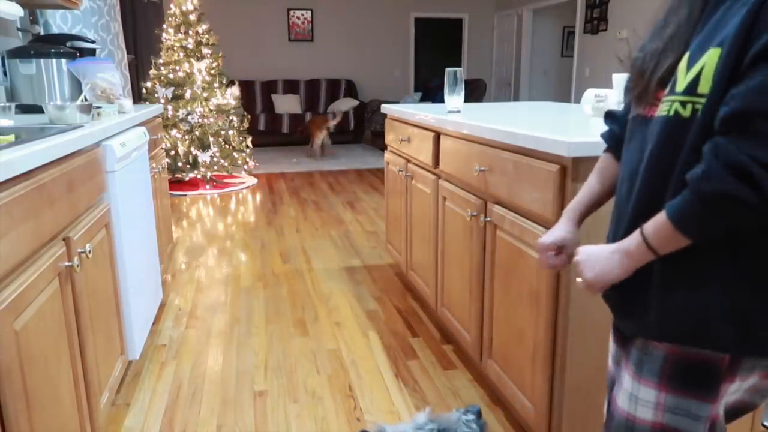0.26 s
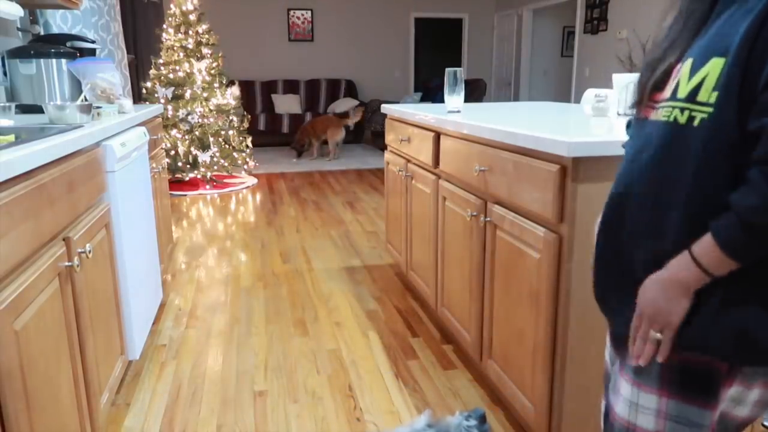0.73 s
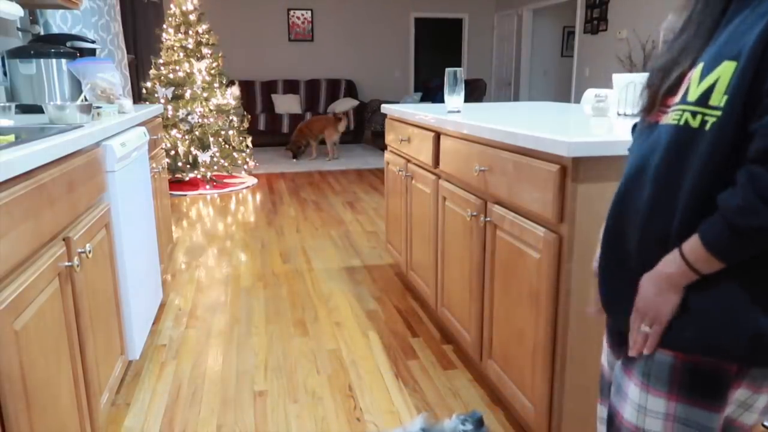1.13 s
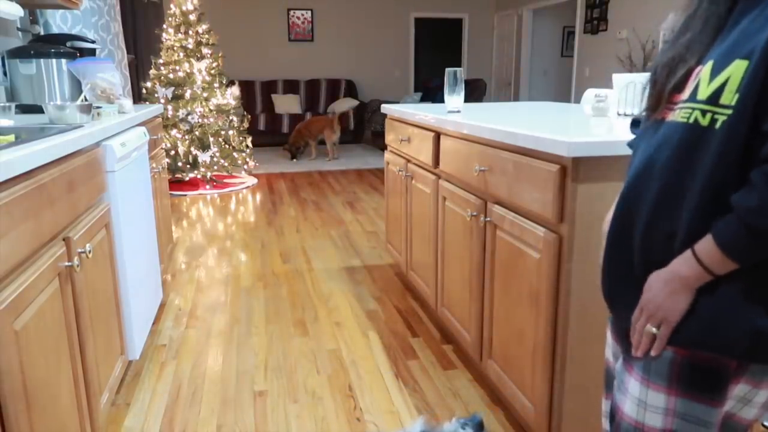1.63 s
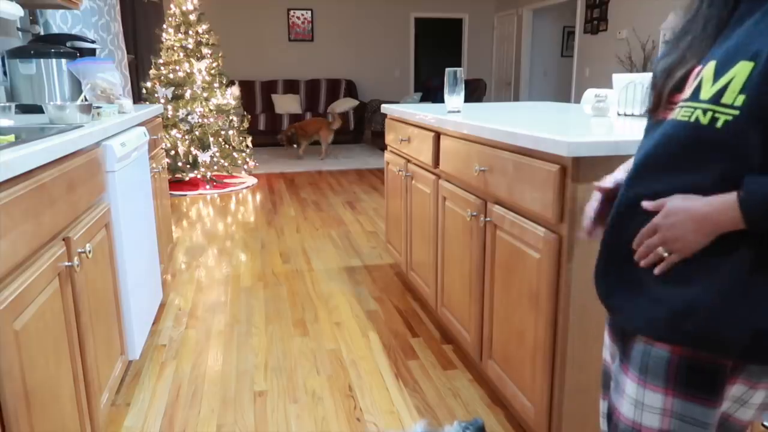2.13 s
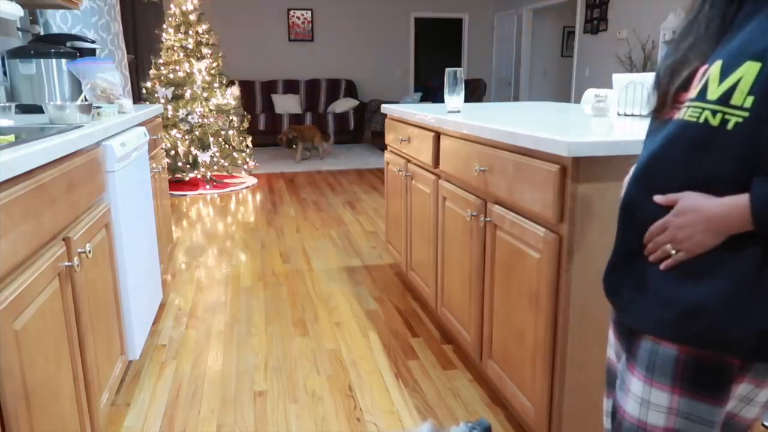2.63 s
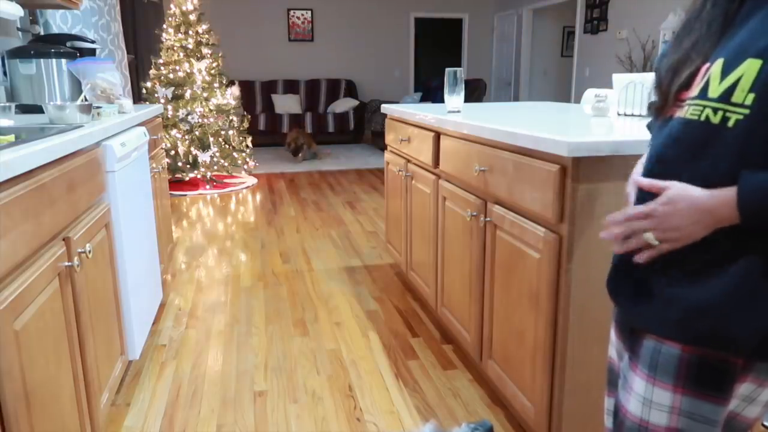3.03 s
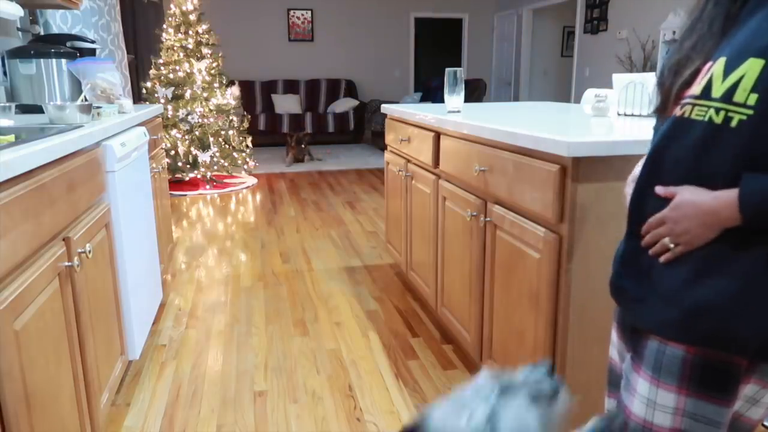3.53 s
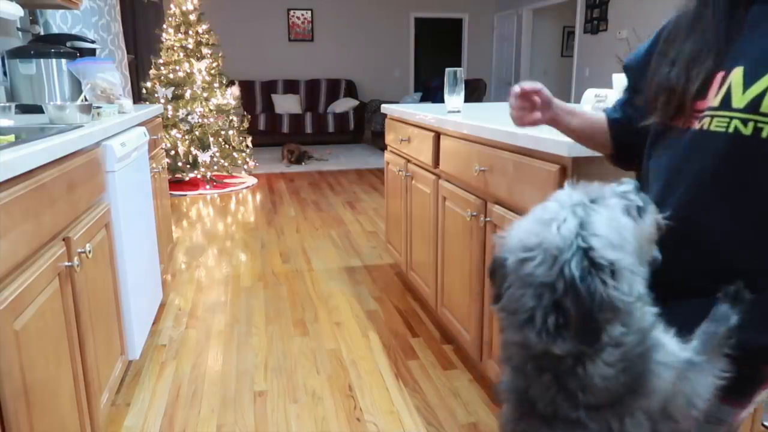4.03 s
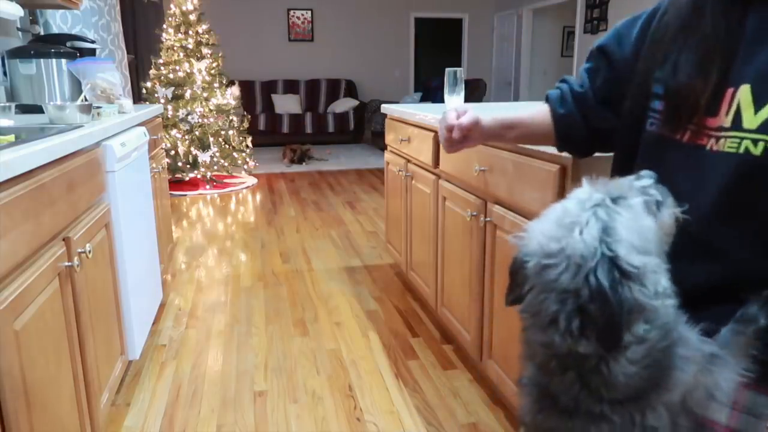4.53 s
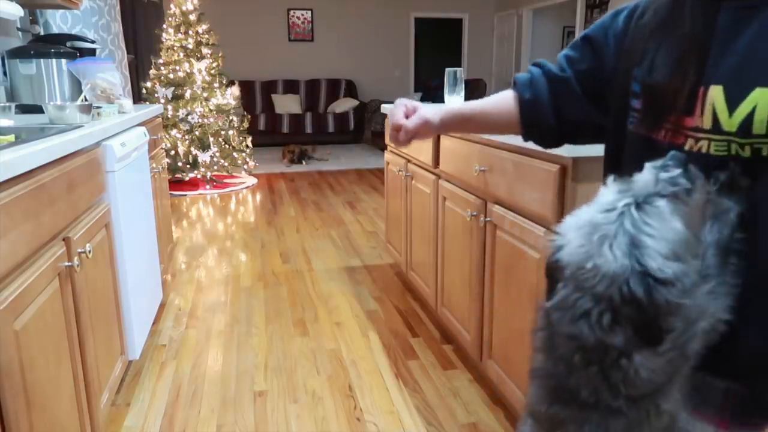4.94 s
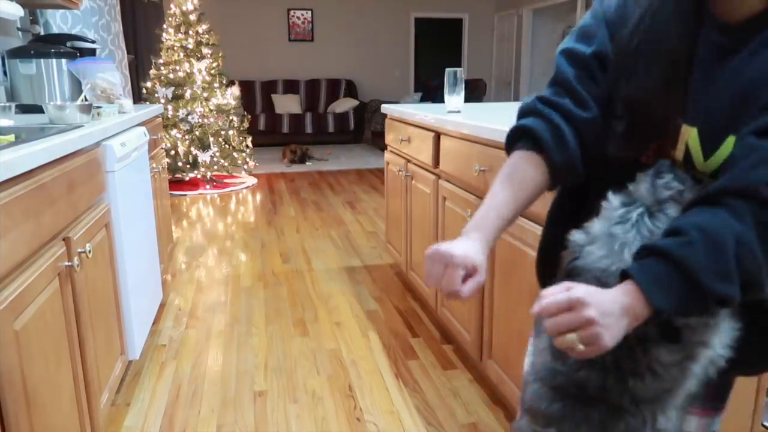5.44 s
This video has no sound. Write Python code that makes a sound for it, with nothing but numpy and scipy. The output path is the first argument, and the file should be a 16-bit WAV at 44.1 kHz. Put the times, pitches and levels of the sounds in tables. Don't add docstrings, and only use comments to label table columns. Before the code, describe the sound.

Throughout, a kitchen appliance runs in an open living space: a low, slightly wavering pump hum, steady mains buzz, resonant airy noise and very thin high whines. At 0.1 s cloth brushes softly; around 0.8 s a sharper rustle comes with a small chattering wooden knock. Single claw ticks follow near 1.0 and 1.55 s. At 2.15 s there is another hollow knock with a brief chirping slip, then brighter nail clicks at 2.35 and 2.44 s. Soft fabric movement and a faint knock pass around 2.9-3.4 s, more cloth at 3.9 s. From 4.25 to 4.85 s a dog's nails trot quickly over the boards, with tiny metallic tag glints. A deep, dull thump lands at 4.94 s, a heavier one at 5.34 s, shuddering through the floor among rustles and paw taps. A last clear claw tap sounds at 5.64 s. Close stereo pickup, short reverberation.

```python
import sys
import numpy as np
from scipy import signal
from scipy.fft import rfft, irfft
from scipy.io import wavfile
from scipy.ndimage import uniform_filter1d

SR = 44100
rng = np.random.default_rng(int(sys.argv[2]) if len(sys.argv) > 2 else 0)


def log_audio(samples):
    frames = np.atleast_2d(samples).T
    limited = np.clip(frames, -1, 1)
    pcm = np.round(limited * 32767).astype(np.int16)
    wavfile.write(sys.argv[1], SR, pcm)


def linear_from_db(decibels):
    return 10 ** (np.asarray(decibels, float) / 20)


N = 250516


def evened(x):
    return x / np.sqrt(np.mean(x ** 2) + 1e-20)


def read(points, hz, order=1):
    table = np.transpose(points)
    return np.interp(np.log(hz + 1), np.log(table[0] + 1), table[order])


def add(mix, s, sound):
    part = mix[round(s * SR):][:len(sound)]
    part += sound[:len(part)]


def spread(events, pattern, axis):
    rows = np.repeat(events, len(pattern), axis=0)
    steps = np.tile(pattern, (len(events), 1))
    out = rows + steps
    out[:, axis] = rows[:, axis] * steps[:, axis]
    return out


def wander(top_hz):
    t = np.arange(0, N + 200, 200) / SR
    rates = np.geomspace(0.15, top_hz, 20)
    slow = sum(np.sin(2 * np.pi * (f * t + rng.random())) / np.sqrt(f) for f in rates)
    return np.interp(np.arange(N) / SR, t, evened(slow))


def lines(turns, table, waver_db):
    out = np.zeros(N)
    for multiple, db in table:
        level = np.sqrt(2) * linear_from_db(db + waver_db * wander(top_hz=5.4))
        out += level * np.sin(2 * np.pi * (multiple * turns + rng.random()))
    return out


def ring(hz, t60, soft_s, size=3000):
    t = np.arange(size) / SR
    return linear_from_db(-60 * t / t60) * (1 - np.exp(-t / soft_s)) * np.sin(2 * np.pi * hz * t)


def burst(noise, low_hz, high_hz, t60):
    dying = noise * linear_from_db(-60 * np.arange(len(noise)) / SR / t60)
    crack = signal.lfilter(*signal.butter(3, [low_hz, high_hz], "band", fs=SR), dying)
    return crack / abs(crack).max()


def air():
    # frequency in Hz, density in dB per Hz.
    air_colour = [(20, -74.5), (45, -72), (70, -65), (100, -55.5), (230, -58.5), (265, -70), (400, -68),
                  (700, -74), (1500, -76), (2500, -77.5), (4000, -86), (7000, -95.5), (11000, -101),
                  (15000, -118)]
    # frequency in Hz, width in Hz, lift in dB.
    lifts = [(176, 52, 4), (202, 35, 0.5), (310.3, 27, 11), (369, 43, 10), (469, 39, 3.5), (502, 40, 8.5),
             (644.4, 26, 10.5), (771, 22, 6.5), (907, 113, 9), (982, 15, 7.5), (1173, 97, 11),
             (1358, 61, 7), (1875, 210, 8)]
    frames = N // 256 + 5
    real_1, imag_1, real_2, imag_2, patches = rng.standard_normal((frames, 513, 5)).T
    patches = evened(uniform_filter1d(uniform_filter1d(patches, 14, 0), 16, 1))
    # 2.2 dB more, faded in over 2500 Hz from 7500 Hz
    top = np.clip((np.fft.rfftfreq(1024, 1 / SR) - 7500) / 2500, 0, 1)[:, None]
    depth_db = 1.22 + 2.2 * top
    field_db = depth_db * patches - depth_db ** 2 * np.log(10) / 20
    spectra = np.array([real_1 + 1j * imag_1, real_2 + 1j * imag_2]) * linear_from_db(field_db)
    white = signal.istft(spectra, nperseg=1024, noverlap=768)[1][:, :N]
    hz = np.fft.rfftfreq(N, 1 / SR)
    colour_db = read(air_colour, hz)
    for centre_hz, width_hz, lift_db in lifts:
        colour_db = colour_db + lift_db / (1 + (2 * (hz - centre_hz) / width_hz) ** 2)
    swell = linear_from_db(0.5 * wander(top_hz=3))
    return irfft(rfft(evened(white) * swell) * linear_from_db(colour_db) * np.sqrt(SR / 2), N)


def hum():
    # multiple of the shaft speed, level in dB rms.
    shaft_lines = [(1, -52), (2, -51), (3, -51), (4, -32), (5, -42), (8, -44), (9, -51), (12, -49),
                   (16, -53), (24, -57), (28, -66)]
    # multiple of the mains frequency, level in dB rms.
    mains_lines = [(2, -44), (3, -47), (4, -50), (5, -47), (6, -51), (7, -56), (8, -57), (10, -57),
                   (12, -51), (14, -59), (16, -56), (18, -60), (20, -62), (22, -58), (30, -62), (40, -59),
                   (55, -72), (58, -71), (84, -77)]
    # frequency in Hz, level in dB rms.
    whines = [(9290, -82), (9650, -76)]
    shaft_hz, mains_hz = 41.043, 59.98
    t = np.arange(N) / SR
    shaft_turns = np.cumsum(shaft_hz * (1 + 0.0012 * wander(top_hz=1.5))) / SR
    pump = lines(shaft_turns, shaft_lines, waver_db=0.5)
    buzz = lines(mains_hz * t, mains_lines, waver_db=0.4)
    return pump + buzz + lines(t, whines, waver_db=3)


def rustles():
    # time of the top in seconds, level in dB rms, rise in s, fall in s, centre in Hz.
    strokes = [(0.132, -44.5, 0.012, 0.026, 5170), (0.773, -40, .003, 0.025, 4230),
               (0.786, -63, 0.009, 0.01, 8000), (1.188, -60, 0.016, 0.028, 6050),
               (1.549, -49, 0.0065, 0.023, 3880), (2.83, -71, .012, .025, 11500),
               (2.898, -58.5, 0.0091, 0.036, 7900), (2.93, -44.5, 0.023, 0.053, 2440),
               (3.371, -56.5, 0.038, 0.062, 8500), (3.384, -47.5, 0.098, 0.23, 3840),
               (3.9, -43.5, 0.1, 0.14, 2540), (4.69, -41.5, 0.01, 0.0082, 5200),
               (4.93, -47.5, 0.047, 0.061, 3280), (5.189, -37.5, 0.06, 0.011, 1880),
               (5.198, -53, 0.045, 0.24, 5600), (5.42, -41, 0.0076, 0.015, 5600)]
    out, t = np.zeros(N), np.arange(-8000, 8000) / SR
    noises = rng.standard_normal((len(strokes), 2, 16000))
    for (s, db, rise, fall, hz), (noise, grain) in zip(strokes, noises):
        fibres = noise * linear_from_db(3.5 * evened(uniform_filter1d(grain, 60)))
        band = evened(signal.lfilter(*signal.butter(3, [hz * 0.17, hz * 1.38], "band", fs=SR), fibres))
        stroke = band * linear_from_db(db) * np.exp(-0.5 * (t / np.where(t < 0, rise, fall)) ** 2)
        skip = max(8000 - round(s * SR), 0)
        add(out, s + t[skip], stroke[skip:])
    return out


def thumps():
    # start in seconds, level in dB, board in Hz, board level in dB, board t60 in s.
    pushes = [
        (4.9383, -10.5, 106, -1, .16),
        (5.3383, -4.5, 152, 0.5, .23),
        (5.4, -18, 130, 0, .2),
        (5.445, -21, 100, 0, .2),
        (5.52, -25, 70, 0, .2),
    ]
    # frequency in Hz, level in dB, t60 in s.
    floor_modes = [(61.2, -0.5, 0.26), (84, -5.5, 0.22), (122, -9.5, 0.17), (205.2, -20, 0.67),
                   (250, -16, 0.14)]
    out = np.zeros(N)
    t = np.arange(20000) / SR
    noises = rng.standard_normal((len(pushes), 20000))
    for (s, db, board_hz, board_db, board_t60), noise in zip(pushes, noises):
        rumble = linear_from_db(-6.5) * (1 - np.exp(-t / 0.014)) * burst(noise, 62, 130, t60=0.33)
        low = sum(linear_from_db(mode_db) * ring(hz, t60, 0.0012, size=20000) for hz, mode_db, t60 in floor_modes)
        board = linear_from_db(board_db) * ring(board_hz, board_t60, 0.003, size=20000)
        add(out, s, linear_from_db(db) * (board - low + rumble))
    return signal.filtfilt(*signal.butter(1, 30, "high", fs=SR), out)


def knocks():
    # start in seconds, body in dB, body in Hz, crack in dB.
    blows = [(0.7685, -19.5, 495, -26.5), (0.811, -18.5, 720, -34.5), (2.143, -18.5, 564, -41),
             (2.1485, -20.5, 745, -54), (2.154, -28, 695, -48), (2.179, -26.5, 910, -43),
             (3.1225, -28, 468, -56), (3.1262, -20.5, 687, -41), (3.134, -31, 905, -41),
             (3.179, -26, 990, -40)]
    # delay in seconds, body in dB, pitch factor, crack in dB.
    bounces = [
        (0, 0, 1, 0),
        (.0045, -9, 1.2, -12),
        (.0115, -6, 1.05, -9),
    ]
    out = np.zeros(N)
    contacts = spread(blows, bounces, axis=2)
    noises = rng.standard_normal((len(contacts), 3000))
    for (s, body_db, hz, crack_db), noise in zip(contacts, noises):
        puff = 0.63 * burst(noise[::-1], 310, 1250, 0.02)
        body = puff + 1.1 * ring(hz, 0.017, 0.00036) + 0.54 * ring(hz * 0.61, 0.029, 0.00054)
        body += 0.51 * ring(hz * 1.54, 0.011, 0.00028) + 0.23 * ring(hz * 2.8, 0.013, 0.00042)
        crack = linear_from_db(crack_db + 10.5) * burst(noise, 1400, 3770, 0.015)
        add(out, s + 0.0006, crack - linear_from_db(body_db + 2.5) * body)
    return out


def glints():
    # start in seconds, level in dB, pitch in Hz, t60 in s.
    tag_rings = [(0.811, -49, 9800, 0.025), (2.3365, -50, 10800, .01), (2.348, -53, 9400, 0.022),
                 (4.2545, -48, 10600, .008), (4.347, -52, 10900, 0.017), (4.4556, -49, 10200, 0.029),
                 (4.5835, -40, 10000, 0.012), (4.6805, -52, 10000, 0.027), (4.69, -58, 9700, 0.025),
                 (4.8234, -35, 10280, 0.019), (4.829, -55, 10200, 0.13)]
    out = np.zeros(N)
    for (s, db, hz, t60), noise in zip(tag_rings, rng.standard_normal((len(tag_rings), 3000))):
        pair = ring(hz, t60, 0.00023) + 0.97 * ring(hz * 0.83, t60, 0.0002)
        add(out, s, linear_from_db(db) * (pair + 0.5 * burst(noise, 7500, 15000, 0.005)))
    return out


def pings():
    # start in seconds, level in dB, pitch in Hz, t60 in s, rise in Hz per s.
    tip_rings = [(2.3365, -26, 5930, 0.0067, 0), (2.3492, -26, 6280, 0.0067, -2),
                 (2.4385, -30, 5500, 0.01, 0), (4.2545, -23, 5340, 0.0085, 0), (4.4548, -29, 6260, .007, 0),
                 (4.4605, -32, 5600, .007, 0), (5.219, -29, 4800, 0.01, 0), (5.3795, -28, 4440, .009, 0),
                 (5.4118, -32, 7100, 0.01, -2), (5.419, -25, 7050, .009, -2), (5.43, -32, 4670, 0.016, -1),
                 (2.144, -24, 520, 0.056, 32000), (2.192, -27, 344, .05, 80000),
                 (2.922, -36, 2560, 0.13, 9000), (3.133, -31, 2880, .015, 0), (4.578, -34, 4300, .01, 0),
                 (4.591, -32, 4200, .02, 0), (4.674, -30, 4430, .012, 0), (4.684, -32, 6300, .015, 0),
                 (4.6955, -25, 4500, .015, 0), (4.701, -31, 4300, .015, 0), (4.827, -28, 4100, .018, 0),
                 (5.4115, -28, 1500, 0.022, 0), (5.427, -29, 1500, .025, 0), (2.3368, -29, 3400, .008, 0),
                 (2.3504, -32, 3300, 0.008, 0), (0.768, -29, 3300, 0.013, 0), (2.4385, -30, 4500, .007, 0),
                 (2.151, -30, 1600, .025, 0), (2.187, -34, 3680, .015, 0)]
    # start in seconds, level in dB.
    hairs = [(0.7688, -54), (2.3368, -56), (4.2555, -49), (4.4548, -57), (4.5845, -56), (4.8236, -48),
             (5.6428, -49)]
    out, t = np.zeros(N), np.arange(4000) / SR
    for s, db, hz, t60, rise in tip_rings:
        envelope = linear_from_db(db - 60 * t / t60) * (1 - np.exp(-t / (0.037 * t60)))
        add(out, s, envelope * np.sin(2 * np.pi * (hz + rise * t / 2) * t))
    for (s, db), noise in zip(hairs, rng.standard_normal((len(hairs), 400))):
        add(out, s, linear_from_db(db) * burst(noise, 8000, 13000, 0.003))
    return out


def claws():
    # start in seconds, tick in dB, bright snap in dB, board ring in dB, ring in Hz.
    taps = [(0.9805, -36.5, -64, -31, 1730), (1.5514, -40, -60, -37, 1530), (2.1871, -43, -45, -27, 1690),
            (2.3365, -28.5, -43, -26, 2000), (2.3492, -28, -54, -20.5, 1990), (2.353, -49, -45, -24, 2070),
            (2.439, -40, -42, -46, 1990), (3.8614, -42, -66, -38, 1970), (3.8984, -42, -66, -29, 1720),
            (4.2552, -36, -42, -32, 2070), (5.1288, -42, -45.5, -30, 1720), (5.1724, -44, -57, -29, 1710),
            (5.1864, -45, -47, -25, 1900), (5.219, -38, -40, -32, 1510), (5.3795, -44, -57, -26, 1450),
            (5.4185, -50, -52, -46, 1500), (5.6385, -30, -45, -23, 1700), (5.6425, -35, -56, -10, 1546),
            (5.657, -44, -50, -31.5, 1610)]
    trot = [(4.3415, -40, -42, -33, 2000), (4.3457, -31.5, -36.5, -23.5, 1950),
            (4.349, -32.5, -35.5, -22.5, 1930), (4.356, -54, -59, -22, 1850), (4.447, -44, -56, -29, 2050),
            (4.4544, -30, -47, -25, 1877), (4.458, -46, -42, -38, 2000), (4.46, -40, -50, -29, 1910),
            (4.467, -48, -60, -29, 1900), (4.579, -36, -51, -33, 1950), (4.5841, -33, -43, -27, 1750),
            (4.5877, -46, -50, -19.5, 1795), (4.5903, -38.5, -43, -26, 1800), (4.597, -44, -56, -23, 1685),
            (4.6812, -43, -38, -25.5, 2000), (4.6869, -44, -46, -23, 1760), (4.689, -39, -46, -24, 1830),
            (4.694, -34, -50, -27, 1760), (4.702, -37, -58, -31, 1740), (4.8192, -43, -52, -36, 1680),
            (4.8236, -30, -34, -24.5, 1710), (4.827, -32, -49, -31, 1800), (4.8285, -41, -51, -26, 1750),
            (4.833, -42, -58, -30, 1680), (4.837, -44, -58, -28, 1700)]
    # main nail in seconds, then the same columns as the taps.
    paws = [
        (5.205, -37, -50, -28, 1760),
        (5.4115, -38, -49, -31, 1500),
    ]
    # seconds from the main nail, tick in dB, snap in dB, ring in dB, pitch factor.
    paw_nails = [
        (-.0055, -10, -10, -12, 1.02),
        (0, 0, 0, -1, 1),
        (.0047, -5, -6, 0, .97),
        (.011, -11, -14, -5, 1.03),
        (.018, -16, -19, -9, .99),
    ]
    out = np.zeros(N)
    nails = np.vstack([taps, trot, spread(paws, paw_nails, axis=4)])
    noises = rng.standard_normal((len(nails), 2, 3000))
    for (s, tick_db, snap_db, ring_db, ring_hz), noise in zip(nails, noises):
        dull = 1.01 * burst(noise[0], 1700, 4430, 0.019) + 0.08 * ring(4350, 0.008, 0.00031)
        tick = linear_from_db(tick_db + 7.5) * dull
        snap = linear_from_db(snap_db + 8) * burst(noise[1], 4260, 7650, 0.0092)
        board = ring(ring_hz, 0.016, 0.0005) + 0.14 * ring(ring_hz * 1.14, 0.053, 0.0017)
        add(out, s, tick + snap + linear_from_db(ring_db + 5) * board)
    return out


def room(x):
    # frequency in Hz, t60 in s.
    decay = [(300, 0.089), (1000, 0.24), (2000, 0.19), (5000, 0.19), (12000, 0.12)]
    taps = np.zeros((2, SR // 2))
    at = np.arange(160, SR // 2 - 20, 20) + rng.integers(0, 20, (2, (SR // 2 - 161) // 20))
    np.put_along_axis(taps, at, rng.choice([-1., 1.], at.shape), 1)
    hz, t, z = signal.stft(taps, SR, nperseg=256)
    tail = signal.istft(z * linear_from_db(-60 * t / read(decay, hz)[:, None]), SR, nperseg=256)[1]
    return signal.fftconvolve(x[None], tail / np.linalg.norm(tail[0]), axes=1)[:, :N]


def ports(field, other, lead):
    # frequency in Hz, likeness from 0 to 1, lead of the right in radians, left over right in dB.
    port_pair = [(100, .99998, 0, 0), (200, .9995, 0, 0), (350, .987, 0, -.4), (900, .99, 0, -1.6),
                 (1900, .98, .1, -1.9), (2700, .85, .45, -2.2), (4000, .58, 1.3, -1.9),
                 (6000, .6, 2.1, -1.2), (8200, .74, 2.85, -.4), (9200, .88, 3.1, 0), (16000, .9, 3.14, 0)]
    hz = np.fft.rfftfreq(N, 1 / SR)
    same = read(port_pair, hz, order=1)
    shift = np.exp(-0.5j * lead * read(port_pair, hz, order=2))
    tilt = linear_from_db(read(port_pair, hz, order=3) / 2) * shift
    left = rfft(field) * tilt
    right = (same * rfft(field) + np.sqrt(1 - same ** 2) * rfft(other)) / tilt
    return irfft([left, right], N)


def scene():
    near = rustles() + knocks() + glints() + pings() + claws()
    tones = hum()
    diffuse = air() + linear_from_db(-9) * room(near) + [tones, 1.07 * np.roll(tones, 30)]
    return ports(*diffuse, lead=1) + ports(near + thumps(), 0.3 * near, lead=0.65)


def circuit_whine():
    # frequency in Hz, level in dB rms.
    circuit = [(13006, -85.8)]
    t = np.arange(N) / SR
    whine = lines(t, circuit, waver_db=1.2) * np.array([[1.9], [0.1]])
    return whine * linear_from_db(-2.5 * (t > 3.55))


def gain_duck(x):
    power_db = 10 * np.log10(abs(uniform_filter1d((x ** 2).mean(0), 400)) + 1e-12)
    fall = np.arange(N) * 20 / SR
    held_db = np.maximum.accumulate(power_db + fall) - fall
    over_db = np.maximum(held_db + 13.5, 0)
    return linear_from_db(0.25 * uniform_filter1d(over_db, 200))


def top_cut(x):
    return signal.sosfilt(signal.butter(12, 15600, fs=SR, output="sos"), x)


def record(dry):
    mix = (dry + circuit_whine()) / gain_duck(dry)
    return top_cut(mix)


dry = scene()
out = record(dry)
log_audio(out)
```